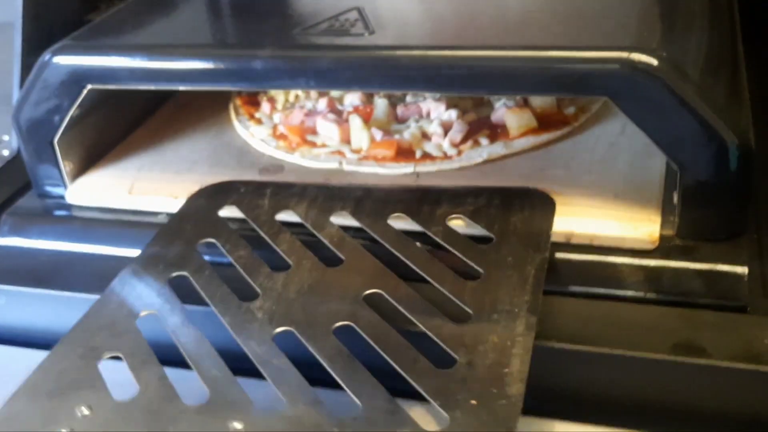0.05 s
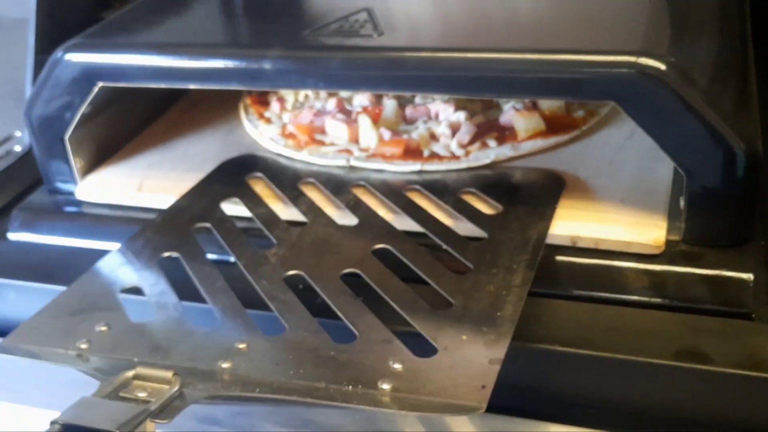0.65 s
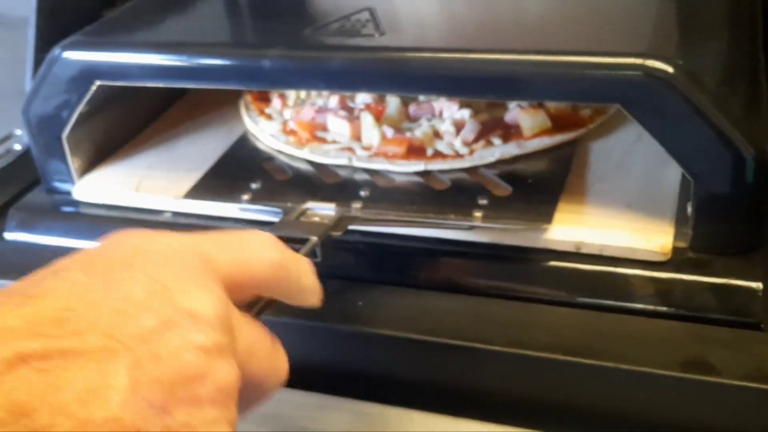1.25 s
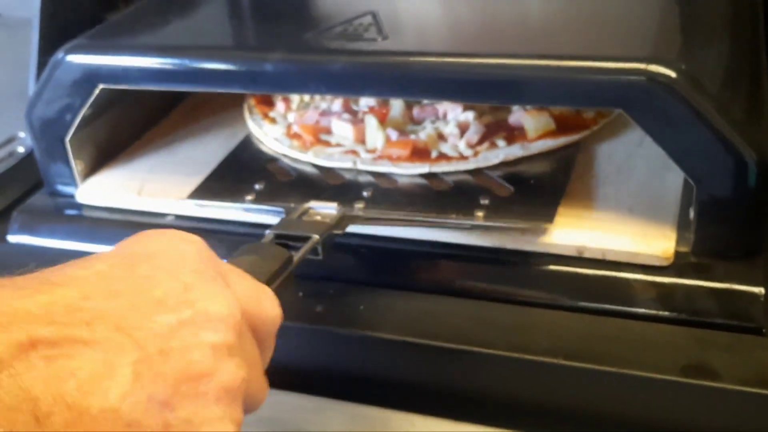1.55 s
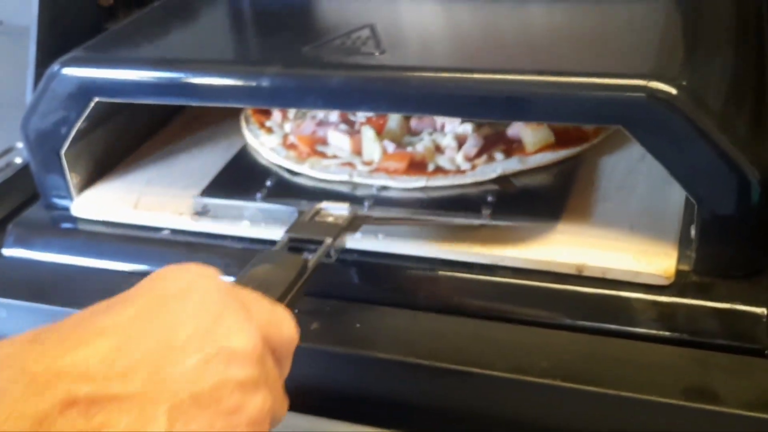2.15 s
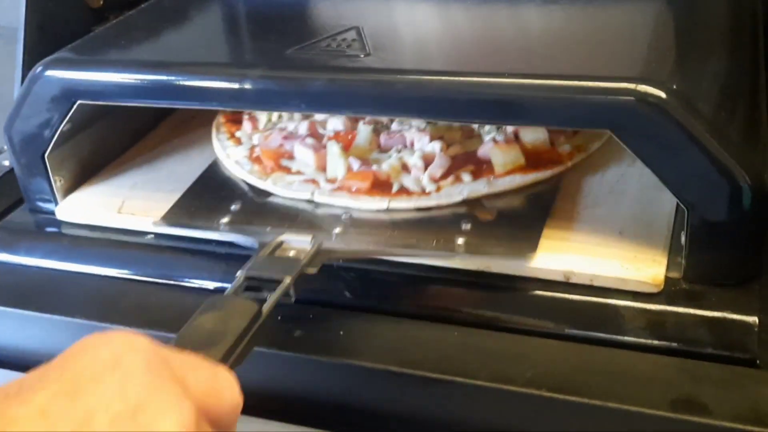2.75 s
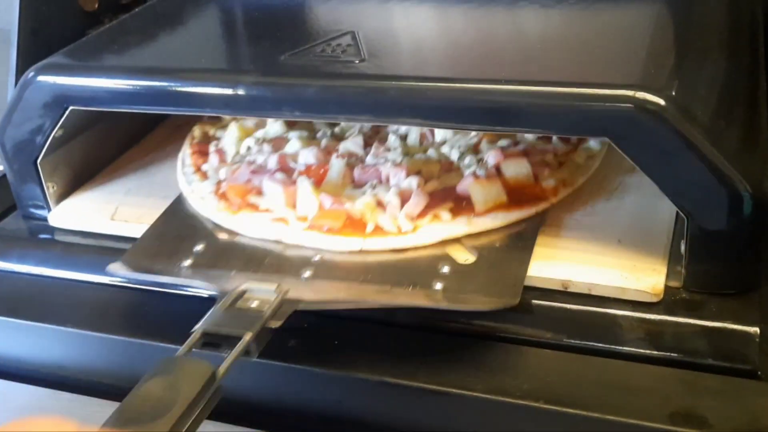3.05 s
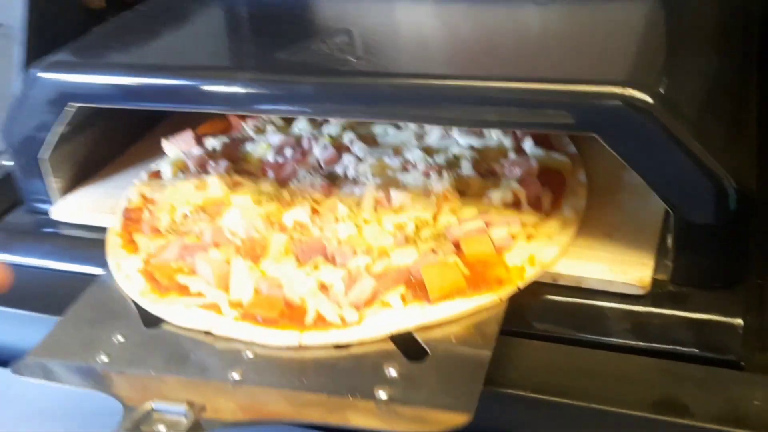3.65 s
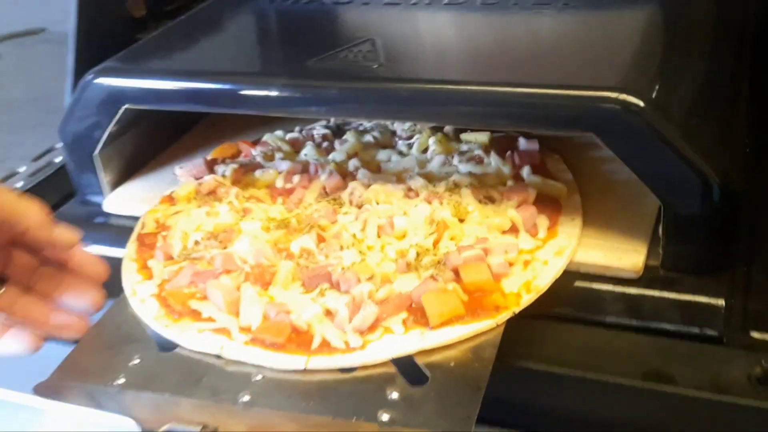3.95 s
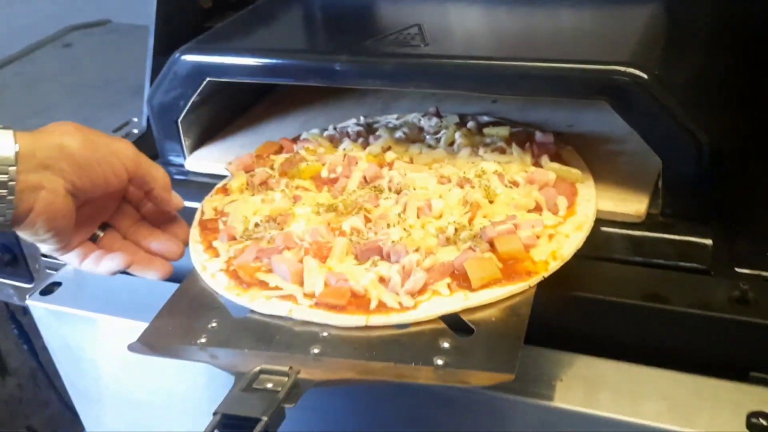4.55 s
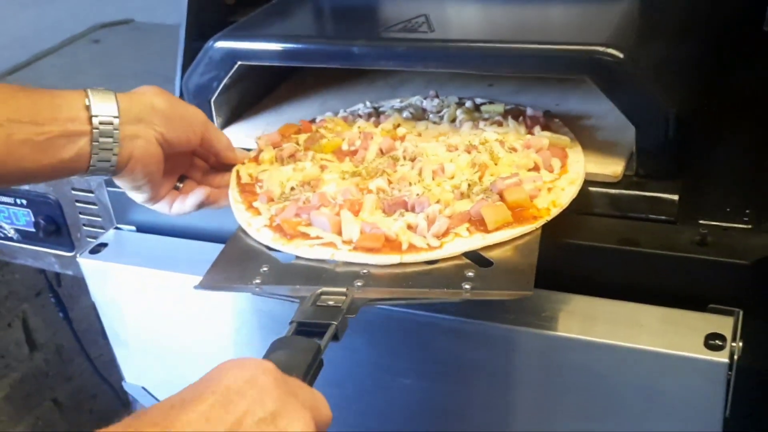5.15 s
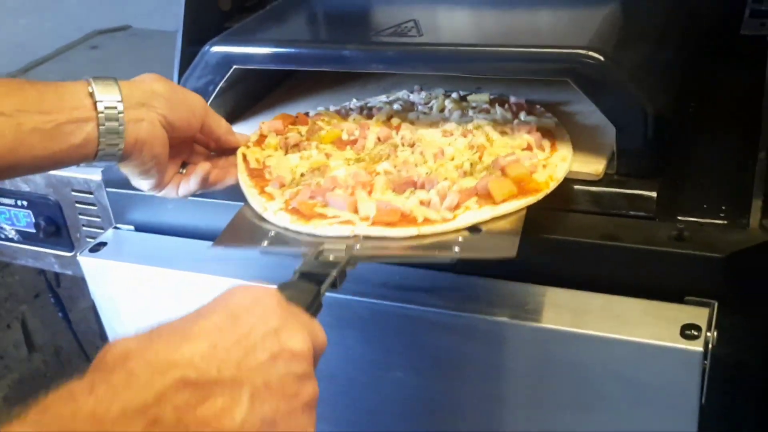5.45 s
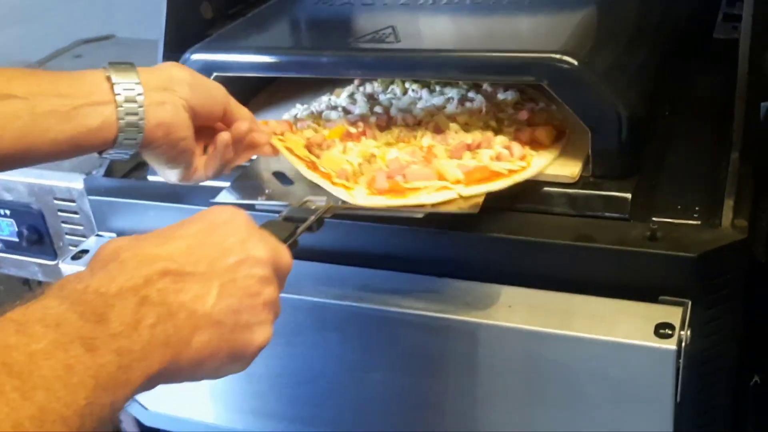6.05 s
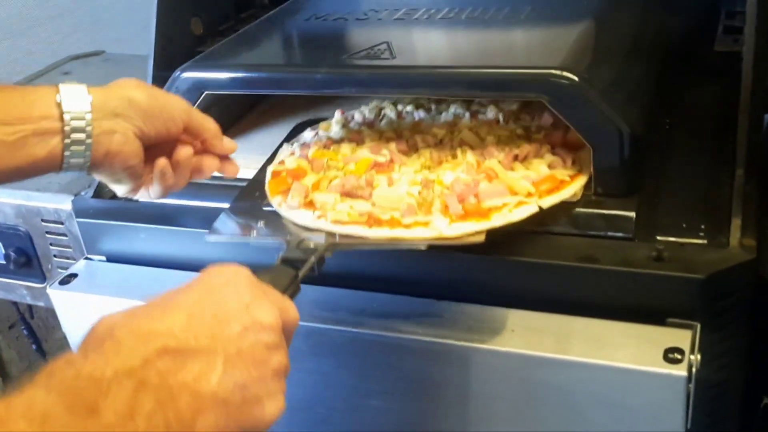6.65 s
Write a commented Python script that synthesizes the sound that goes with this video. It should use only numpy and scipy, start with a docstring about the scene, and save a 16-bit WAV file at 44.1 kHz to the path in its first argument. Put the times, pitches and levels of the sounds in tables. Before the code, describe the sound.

A thin metal pizza peel scrapes into a small steel oven with a hissing rasp and a slight ring. It strikes the oven with one loud, booming clank, followed by lighter knocks as it is shoved under the pizza. Softer gritty scraping follows, with ticks and crackling crumbs, as the blade is drawn out over the stone and pushed back in. The sound is close and leans right, over a faint outdoor rush.

```python
"""Pizza peel in a steel oven

A perforated metal peel scrapes into a small oven, clanks on the sill and is shoved under the pizza,
then drawn out over the stone and pushed in again. Grit rings the thin blade; blows ring the oven's shell.
A faint outdoor rush lies underneath, and the right microphone port faces the blade."""
import sys
import numpy as np
from scipy import signal
from scipy.fft import rfft, irfft, next_fast_len
from scipy.io import wavfile
from scipy.ndimage import map_coordinates

SR = 44100
rng = np.random.default_rng(int(sys.argv[2]) if len(sys.argv) > 2 else 0)


def transcribe(u):
    """Save the signal u as a 16-bit wav file named by the first command-line argument.

    u: samples, shape (n,) or (channels, n), limited to [-1, 1]; the rate is SR.
    q: integer samples, one column per channel.
    """
    v = np.clip(np.atleast_2d(u).T, -1, 1)
    q = np.round(v * 32767).astype(np.int16)
    wavfile.write(sys.argv[1], SR, q)


N = 299880


def amp(db):
    """Decibels to gain."""
    return 10 ** (np.asarray(db) / 20)


def unit(pair):
    """Scale a stereo pair so that its centre has rms 1."""
    return pair / np.sqrt(np.mean(pair.mean(0) ** 2) + 1e-20)


def along(points, hz):
    """Read a curve of (freq_hz, value) points on a log frequency axis."""
    freqs, values = np.transpose(points)
    return np.interp(np.log(hz + 1), np.log(freqs + 1), values)


def automation(points):
    """Join (time_s, value) points into one value per sample."""
    return np.interp(np.arange(N) / SR, *np.transpose(points))


def wobble(per_s):
    """A drifting curve that joins per_s random values a second."""
    knots = rng.standard_normal(int(N * per_s / SR) + 4)
    return map_coordinates(knots, [np.arange(N) * per_s / SR], order=1)


def filtered(x, response):
    """Equalise x with a gain that depends on frequency."""
    size = x.shape[-1]
    padded = next_fast_len(size + 8192)
    return irfft(rfft(x, padded) * response(np.fft.rfftfreq(padded, 1 / SR)), padded)[..., :size]


def dying(x, ring_times):
    """Let each frequency of x fade at its own speed."""
    hz, t, bands = signal.stft(x, SR, nperseg=256)
    fade = amp(-60 * t / along(ring_times, hz)[:, None])
    return signal.istft(bands * fade, SR, nperseg=256)[1][:, :x.shape[1]]


def add(track, start_s, sound):
    """Mix a sound into the track."""
    part = track[:, max(round(start_s * SR), 0):][:, :sound.shape[1]]
    part += sound[:, :part.shape[1]]


# How alike the two microphone ports sound: freq_hz, correlation
PORT_LIKENESS = [(100, 0.83), (350, 0.8), (800, .85), (1600, 0.25), (3000, 0.63), (6000, -0.49),
                 (14000, 0.37)]
# The peel sits to the right: freq_hz, left_minus_right_db
PEEL_PAN = [(100, -7), (350, -4), (1000, -5), (2400, -4.5), (4000, -6), (6000, -11.5), (9000, -13),
            (14000, -16)]
def at_ports(pair, colour, pan=PEEL_PAN):
    """Colour two unrelated signals and give them the width and balance of the two ports."""
    def mid_side(hz):
        width = np.arccos(np.clip(along(PORT_LIKENESS, hz), -1, 1)) / 2
        return colour(hz) * np.array([np.cos(width), np.sin(width)])

    def left_right(hz):
        lean = np.arctan(amp(along(pan, hz)))
        return np.array([np.sin(lean), np.cos(lean)])

    mid, side = filtered(pair, mid_side)
    return unit(filtered(np.array([mid + side, mid - side]), left_right))


def noise(spectrum, size=N, pan=PEEL_PAN):
    """Stereo noise of a given colour."""
    return at_ports(rng.standard_normal((2, size)), lambda hz: amp(along(spectrum, hz)), pan)


# Colour of the outdoor bed: freq_hz, level_db
AIR_COLOUR = [(20, -50), (45, -19), (110, -5.5), (160, -11), (220, -13), (275, -3.5), (340, -10),
              (560, -17.5), (3300, -31), (5200, -23.5), (9000, -30.5), (16000, -44)]
# The bed leans right: freq_hz, left_minus_right_db
AIR_PAN = [(60, -3), (300, -11.5), (2500, -8), (14000, -9)]
def background():
    """A low, nearly steady outdoor rush."""
    return amp(-61.5 + 0.48 * wobble(6.5)) * noise(AIR_COLOUR, pan=AIR_PAN)


# Strokes of the peel: start_s, rise_s, hold_s, coast_t60_s, hiss_db, rasp_db, shudder_db
STROKES = [(-.025, 0.044, 0.18, 0.86, -46.5, -47.5, -44.5), (0.336, 0.049, 0.13, 0.27, -35.5, -41.5, -43),
           (0.673, 0.033, 0.062, 0.077, -44.5, -51.5, -49), (0.8, 0.026, 0.22, 0.37, -64.5, -65, -66),
           (1.029, 0.046, .01, 0.23, -21, -25, -50.5), (1.408, 0.042, 0.2, 0.9, -60.5, -56, -51),
           (1.742, 0.046, 0.026, 0.16, -37, -38, -37), (2.013, 0.21, 0.16, 0.12, -48, -48.5, -48.5),
           (2.434, 0.022, 0.064, 0.44, -55, -55, -51), (2.588, 0.1, 0.023, 0.89, -54.5, -51.5, -53.5),
           (2.911, 0.029, 0.0098, 0.24, -45.5, -41.5, -53), (2.999, .08, 1.4, 1, -55, -55, -59.5),
           (5.168, 0.25, 0.52, 0.98, -50, -53.5, -52.5), (5.776, 0.081, 0.046, 0.99, -47, -47.5, -48),
           (6.03, 0.18, 0.083, 1, -53, -52.5, -58), (6.556, 0.19, 0.13, 0.57, -52.5, -57.5, -58)]
# The edge digs in and the hiss swells: peak_s, length_s, hiss_db
EDGE_BITES = [(0.175, 0.12, -33.5), (0.864, 0.051, -49), (1.025, 0.097, -45), (1.601, 0.017, -44.5),
              (1.714, 0.12, -53), (1.935, 0.054, -51), (3.13, 0.029, -49), (3.274, 0.036, -48),
              (3.543, 0.12, -50), (3.643, .06, -48), (4.064, 0.024, -46.5), (4.148, 0.038, -42.5),
              (4.266, 0.024, -43.5), (4.309, 0.087, -49.5), (4.452, 0.057, -46), (5.414, .04, -44.5),
              (5.597, 0.11, -46)]
def rubbing():
    """Gains of hiss, rasp and shudder: each stroke speeds up, holds and coasts; bites add mostly hiss."""
    t, power = np.arange(N) / SR, np.zeros((3, N))
    for start_s, rise_s, hold_s, t60_s, *levels_db in STROKES:
        push = np.sin(np.pi / 2 * np.clip((t - start_s) / rise_s, 0, 1)) ** 2
        coast = amp(-60 * np.maximum(t - start_s - rise_s - hold_s, 0) / t60_s)
        power += np.outer(amp(levels_db), push * coast) ** 2
    for peak_s, length_s, hiss_db in EDGE_BITES:
        width_s = length_s * np.where(t < peak_s, 0.43, 0.57)  # digs in faster than it lets go
        swell = np.exp(-((t - peak_s) / width_s) ** 2)
        power[:2] += np.outer(amp([hiss_db, hiss_db - 9]), swell) ** 2
    hiss, rasp, shudder = np.sqrt(power)
    return hiss, rasp, lagging(shudder, t60_s=0.25)


def lagging(drive, t60_s):
    """The swing of a resonator that builds up under a drive and dies away after it."""
    feedback = amp(-60 / (t60_s * SR))
    return signal.lfilter([1 - feedback], [1, -feedback], drive)


def grit(spectrum, per_s, spread_db, grain_db):
    """Friction: a smooth rush plus sharp grains of uneven size."""
    sizes = amp(spread_db * rng.random(N)) * rng.choice([-1, 1], (2, N))
    grains = (rng.random(N) < per_s / SR) * sizes
    rush = unit(rng.standard_normal((2, N)))
    return at_ports(rush + amp(grain_db) * unit(grains), lambda hz: amp(along(spectrum, hz)))


# Ring time of the thin blade: freq_hz, t60_s
BLADE_DECAY = [(500, 0.44), (3000, 0.18), (7000, 0.086), (15000, 0.081)]
def through_blade(x, ring_share):
    """The slotted sheet rings in hundreds of close modes, whose mix shifts as the contact point moves."""
    hop = SR // 4
    rung, padded = np.zeros((2, N + hop)), np.pad(x, ((0, 0), (hop, 2 * hop)))
    for start in range(0, N + hop, hop):
        ring = dying(rng.standard_normal((2, SR // 6)), BLADE_DECAY)
        ring /= np.linalg.norm(ring, axis=1, keepdims=True)
        piece = padded[:, start:start + 2 * hop] * np.sqrt(np.hanning(2 * hop))
        add(rung, start / SR, signal.fftconvolve(piece, ring, axes=1))
    return np.sqrt(1 - ring_share) * x + np.sqrt(ring_share) * rung[:, hop:]


# The blade's bending note sinks as more of it overhangs: time_s, pitch_hz
BEND_GLIDE = [(3.3, 1037), (3.55, 956.5), (3.9, 824), (4.5, 776)]
def bending(width_hz):
    """A fuzzy gliding resonance of the blade, strongest as it is drawn out loaded."""
    fuzz = rng.standard_normal(N) + 1j * rng.standard_normal(N)
    decay = np.exp(-np.pi * width_hz * np.arange(SR // 8) / SR)
    band = signal.fftconvolve(fuzz, decay)[:N]
    phase = 2 * np.pi * np.cumsum(automation(BEND_GLIDE)) / SR
    tone = (band * np.exp(1j * phase)).real
    swell = automation([(3.1, 0.24), (3.5, 1), (4.5, 0.47), (4.8, 0.055)])
    return swell * unit(tone * amp([[-4], [0]]))


# Bright hiss of the edge: freq_hz, level_db
HISS_COLOUR = [(1800, -26), (3000, -7.5), (4300, -11), (5200, -2), (6200, -1), (7500, -6), (10500, -8.5),
               (13000, -5.5), (16000, -7.5)]
# Midrange rasp of the blade's face: freq_hz, level_db
RASP_COLOUR = [(300, -9.5), (480, -10.5), (600, -1), (1050, 1), (1300, -0.5), (1650, -1), (1900, 3),
               (2300, -1), (3100, -6.5), (5200, -0.5), (8000, -26)]
# Drone of the oven shell, shaken by the empty blade: freq_hz, level_db
DRONE_COLOUR = [(30, -46), (60, -11), (120, -5.5), (180, 7.5), (255, -5.5), (350, 9), (440, -12),
                (550, -0.5), (760, 2), (1100, -34), (2000, -66)]
# The blade's own hum under the pizza: freq_hz, level_db
HUM_COLOUR = [(25, -42), (60, -3.5), (130, -7.5), (200, -5), (265, -8), (315, 8), (345, 2.5), (410, -12.5),
              (700, -37.5)]
# How much of the pizza's weight rides on the blade: time_s, weight_share
PIZZA_LOAD = [(1.1, 0), (2.9, 0), (3.7, 0.86), (5.3, 0.37)]
def scrape(hiss_gain, rasp_gain, shudder_gain):
    """One small judder shakes the edge's hiss, the face's rasp and the low shudder; the blade bends."""
    judder_db = wobble(110) + 0.16 * wobble(22)
    hiss = hiss_gain * amp(2.4 * judder_db + 2)
    hiss = hiss * grit(HISS_COLOUR, per_s=1500, spread_db=31, grain_db=-4.5)
    rasp = rasp_gain * amp(1.07 * judder_db - 0.5)
    rasp = rasp * grit(RASP_COLOUR, per_s=980, spread_db=24.5, grain_db=-7.5)
    bend = rasp_gain * amp(-1) * bending(width_hz=88)
    load = automation(PIZZA_LOAD)
    drone = np.sqrt(1 - load) * noise(DRONE_COLOUR, pan=[(100, -13.5), (400, -4.5)])
    hum = np.sqrt(load) * noise(HUM_COLOUR, pan=[(100, -8.5), (400, -17.5)])
    shudder = shudder_gain * amp(1.1 * judder_db - 0.65) * (drone + hum)
    return through_blade(hiss, ring_share=0.93) + through_blade(rasp, ring_share=0.74) + bend + shudder


# Dull knock of the stone: freq_hz, level_db
KNOCK_COLOUR = [(200, -43), (500, 1), (930, 5), (1300, -1.5), (1700, 0), (3000, -9), (8000, -45)]
# The edge catches on the stone: start_s, level_db, knock_vs_tick_db
EDGE_CATCHES = [(0.0203, -35, -6), (0.0605, -25.5, -3), (0.2798, -27, -16.5), (0.324, -32.5, -14),
                (0.9338, -37.5, -23), (0.9982, -36, -21), (2.4575, -29.5, -3), (2.7632, -44, 4.5),
                (2.9252, -32.5, -14), (3.0326, -37.5, -1), (3.2252, -36, 0.5), (3.3377, -38.5, 1.5),
                (6.1656, -36, -8), (6.4842, -40, 4.5)]
def catches(tick_t60_s=0.036, knock_t60_s=0.04):
    """The edge snags and lets go: a short bright tick and a knock from the stone."""
    track, t = np.zeros((2, N)), np.arange(SR // 4) / SR
    for start_s, level_db, knock_db in EDGE_CATCHES:
        tick = noise(HISS_COLOUR, t.size) * amp(-60 * t / tick_t60_s)
        knock = noise(KNOCK_COLOUR, t.size) * amp(knock_db - 60 * t / knock_t60_s)
        add(track, start_s, amp(level_db - 4.5) * (tick + knock))
    return through_blade(track, ring_share=0.35)


# The blade's singing modes: pitch_hz, width_hz, level_db
SING_MODES = [(841.3, 18, 5), (2200, 22, -10), (5660, 60, -17), (5640, 30, -21)]
# The empty blade sings as it rubs over the sill: peak_s, level_db
SING_SWELLS = [(.06, -46), (.3, -46.5), (.51, -35)]
def singing(rise_s=0.072, t60_s=0.53):
    """Before the dough damps the blade, rubbing builds up a few of its modes, which then ring out."""
    def resonances(hz):
        return sum(amp(level_db) * width_hz ** 1.5 / ((hz - pitch_hz) ** 2 + (width_hz / 2) ** 2)
                   for pitch_hz, width_hz, level_db in SING_MODES)

    t, swing = np.arange(N) / SR, np.zeros(N)
    for peak_s, level_db in SING_SWELLS:
        build = np.exp(-((t - peak_s) / rise_s) ** 2)
        tail = amp(-60 * np.abs(t - peak_s) / t60_s)
        swing += amp(level_db) * np.where(t < peak_s, build, tail)
    return swing * at_ports(rng.standard_normal((2, N)), resonances)


# Main modes of the oven shell: pitch_hz, level_db, t60_s
SHELL_MODES = [(119.2, -12.5, 0.69), (161.8, -11.5, 0.73), (191.7, -1, 0.64), (310.3, -10.5, 0.59),
               (328, -7, 0.93), (440, -16.5, 0.99), (512, -9.5, 0.87), (640, -22, 0.73), (735, -11.5, 0.94),
               (787, -5.5, 0.43), (820, -15.5, 0.88), (1026, -13, 0.72), (1317, -25.5, 0.35),
               (1925, -10, 0.43), (1980, -16.5, 0.43), (2450, -37, 0.19)]
# Tail of the shell's boom and crash: freq_hz, t60_s
SHELL_DECAY = [(60, 0.3), (170, 0.88), (400, 0.54), (900, 0.53), (2000, 0.62), (4000, 0.37), (8000, 0.33),
               (15000, 0.26)]
# Low body of a blow: freq_hz, level_db
BOOM_COLOUR = [(25, -70), (50, -26), (75, -10), (110, -6.5), (190, -1), (264, -7.5), (333, 3), (400, -5),
               (700, -8.5), (1250, -14), (1950, -18.5), (4000, -27.5), (8000, -87.5)]
# Bright top of a blow: freq_hz, level_db
CRASH_COLOUR = [(1000, -42), (2000, -4), (3000, -9), (5100, 0.5), (8000, -8.5), (16000, -14.5)]
# The peel hits the oven: start_s, level_db, crash_trim_db, bass_trim_db
BLOWS = [(1.1483, -7, -5, -2), (1.176, -16, -15, 2.5), (1.744, -21.5, -1.5, -1.5),
         (1.789, -24.5, -3.5, 3.5), (1.877, -30, -22.5, -26), (2.384, -27.5, -14.5, -11),
         (2.425, -33.5, -39.5, -1), (2.791, -23.5, -11, -6), (2.866, -36.5, -20, 4), (2.925, -39, 2, 8.5),
         (3.032, -45, -20, 5)]
def clanks(detune=0.0056, attack_s=0.0007):
    """Each blow rings the shell's main modes over a dense boom, with a bright crash of sheet metal."""
    track, t = np.zeros((2, N)), np.arange(SR) / SR
    attack = 1 - np.exp(-t / attack_s)
    snap = 1 + 0.51 * np.exp(-t / 0.011)
    for start_s, level_db, crash_db, bass_db in BLOWS:
        ring = np.zeros(SR)
        for pitch_hz, mode_db, t60_s in SHELL_MODES:
            swing = amp(mode_db + rng.normal(0, 1.74) - 60 * t / t60_s) * rng.choice([-1, 1])
            ring += swing * np.sin(2 * np.pi * pitch_hz * rng.normal(1, detune) * t)
        ring = ring * amp([[-14.5], [-11.5]])
        boom = amp(-9) * dying(noise(BOOM_COLOUR, SR), SHELL_DECAY)
        crash = amp(crash_db - 10) * snap * dying(noise(CRASH_COLOUR, SR), SHELL_DECAY)
        # a flat, heavy contact drives the low modes more than a glancing one
        body = filtered(ring + boom, lambda hz: amp(along([(300, bass_db), (600, 0)], hz)))
        add(track, start_s, amp(level_db) * attack * (body + crash))
    return track


def crumbs(hiss_gain):
    """Hard burnt crumbs crack under the moving edge once the blade carries the pizza."""
    cracks = hiss_gain * amp(-13.5) * grit(HISS_COLOUR, per_s=36, spread_db=26, grain_db=33.5)
    return through_blade(np.sqrt(automation(PIZZA_LOAD)) * cracks, ring_share=0.47)


# High partials of the blade's clink: pitch_hz, level_db
CLINK_MODES = [(4102, -1), (4224, -2), (4940, -2), (5028, -2), (5420, -6)]
# The blade clinks as the pull begins: start_s, level_db
CLINK_HITS = [(2.926, -41), (3.032, -52), (3.224, -54)]
def clinks(t60_s=0.2):
    """A clean snag rings a few high modes of the blade."""
    track, t = np.zeros((2, N)), np.arange(SR // 4) / SR
    for start_s, level_db in CLINK_HITS:
        ring = sum(amp(mode_db + rng.normal(0, 2, (2, 1))) * np.sin(2 * np.pi * pitch_hz * t)
                   for pitch_hz, mode_db in CLINK_MODES)
        add(track, start_s, amp(level_db - 60 * t / t60_s) * ring * amp([[-4], [2]]))
    return track


def scene():
    """Peel and oven over the outdoor bed."""
    hiss_gain, rasp_gain, shudder_gain = rubbing()
    friction = scrape(hiss_gain, rasp_gain, shudder_gain) + crumbs(hiss_gain) + singing()
    return friction + clanks() + catches() + clinks() + background()


def record(dry, ceiling=0.85, top_hz=15850):
    """The camera rounds off the highest peaks and keeps nothing above its band limit."""
    rounded = dry / (1 + (dry / ceiling) ** 4) ** (1 / 4)
    return filtered(rounded, lambda hz: hz < top_hz)


dry = scene()
out = record(dry)
transcribe(out)
```